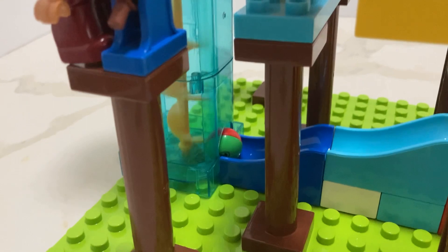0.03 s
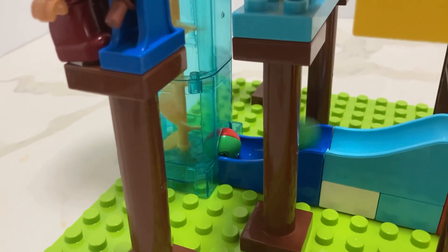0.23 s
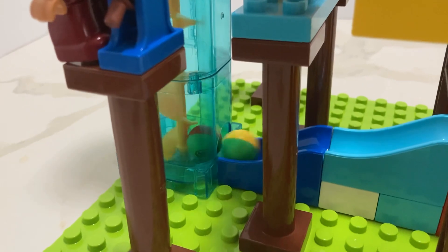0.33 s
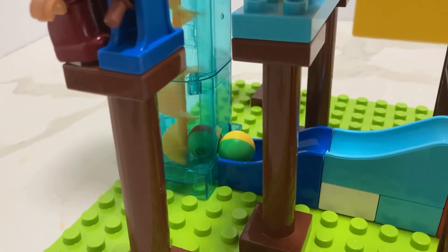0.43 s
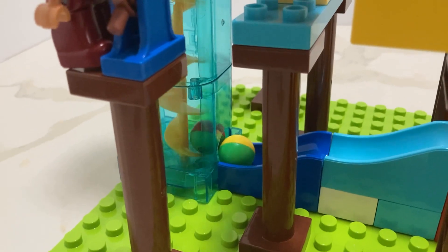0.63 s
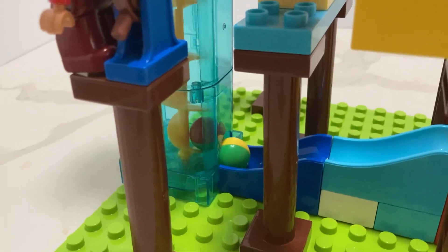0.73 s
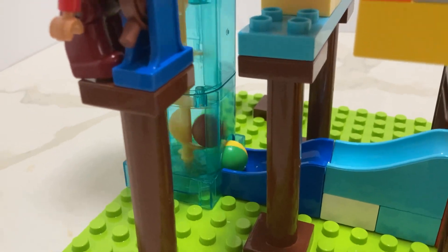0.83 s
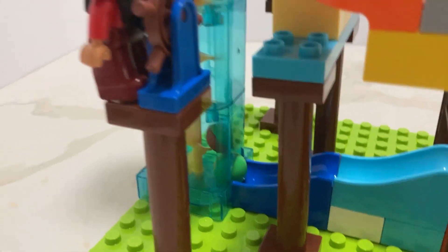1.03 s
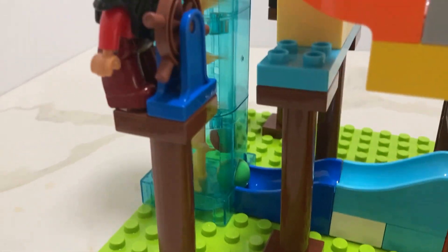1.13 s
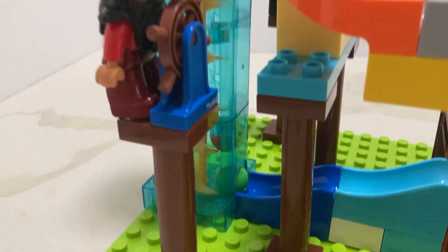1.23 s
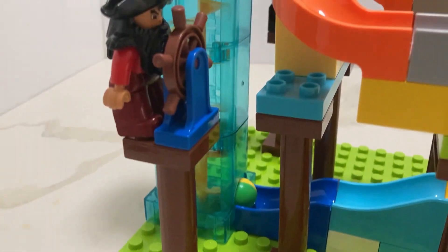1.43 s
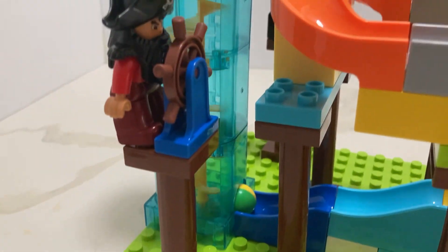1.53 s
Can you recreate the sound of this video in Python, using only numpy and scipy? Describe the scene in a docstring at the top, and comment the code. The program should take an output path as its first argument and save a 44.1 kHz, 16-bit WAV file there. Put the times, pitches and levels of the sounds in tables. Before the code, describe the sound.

Marbles roll and clack in a plastic chute from about 0.1 to 0.7 seconds, quick and hard, with soft low bumps of the base around 0.4. From 0.8 seconds a screw lift rubs them along its tube, with sharp knocks near 1.1 and 1.3, easing off by 1.5. A small motor hums faintly throughout, heard close in a small room.

```python
"""A plastic marble run, close by in a small room.
Marbles roll down a chute and clack against its walls and each other; a screw lift then rubs and
knocks them along its tube. Each contact excites dense, short-lived modes of the plastic and a set
of distinct ringing ones. The base bumps softly on the table; a small motor hums over the room air."""
import sys
import numpy as np
from scipy import signal
from scipy.fft import rfft, irfft
from scipy.io import wavfile
from scipy.ndimage import uniform_filter1d

SR = 44100
rng = np.random.default_rng(int(sys.argv[2]) if len(sys.argv) > 2 else 0)


def transcribe(signal):
    """Save signal, clipped to [-1, 1], as a 16-bit WAV file at the path in sys.argv[1]."""
    frames = np.atleast_2d(signal).T
    limited = np.clip(frames, -1, 1)
    pcm = np.round(limited * 32767).astype(np.int16)
    wavfile.write(sys.argv[1], SR, pcm)


N = 70560
TIME_S = np.arange(N) / SR
BAND_EDGES_HZ = 25 * 2 ** (np.arange(29) / 3) * 1.02


def from_db(db):
    """Decibels to gain."""
    return 10 ** (np.asarray(db) / 20)


def unit_rms(x):
    """Scale to unit power."""
    return x / np.sqrt(np.mean(x ** 2) + 1e-20)


def at_hz(table, hz, column=1):
    """Interpolate a table column over log frequency."""
    table = np.array(table)
    return np.interp(np.log(hz), np.log(table[:, 0]), table[:, column])


def bell(hz, centre_hz, octaves):
    """Gaussian hump over log frequency."""
    return np.exp(-(np.log2(hz / centre_hz) / octaves) ** 2)


def drift(corner_hz):
    """Slow random wander, unit RMS."""
    hop, settle = 40, 2000
    pole = np.exp(-2 * np.pi * corner_hz * hop / SR)
    noise = rng.standard_normal(N // hop + settle + 2)
    slow = signal.lfilter([1], [1, -2 * pole, pole * pole], noise)[settle:]
    return np.interp(np.arange(N) / hop, np.arange(len(slow)), unit_rms(slow))


def noise_bands(lowest_hz):
    """Yield (centre in Hz, stereo noise with a flattened envelope) per third octave."""
    for low, high in zip(BAND_EDGES_HZ, BAND_EDGES_HZ[1:]):
        hz = np.sqrt(low * high)
        if hz > lowest_hz:
            bandpass = signal.butter(3, [low, high], "band", fs=SR, output="sos")
            band = signal.sosfilt(bandpass, rng.standard_normal((2, N + 4000)))
            power = uniform_filter1d(band ** 2, int(2 * SR / (high - low)), axis=1)
            yield hz, (band / np.sqrt(np.abs(power) + 1e-14))[:, -N:]


def clicks(start_s, sizes):
    """One impulse per contact."""
    return np.bincount(np.clip(start_s * SR, 0, N - 1).astype(int), sizes, N) + 1e-18


def decay(x, t60_s):
    """Each impulse starts an exponential decay."""
    return signal.lfilter([1], [1, -from_db(-60 / (t60_s * SR))], x)


def soften(x, rise_s):
    """One-pole low-pass: spreads a contact in time."""
    pole = np.exp(-1 / (rise_s * SR))
    return signal.lfilter([1 - pole], [1, -pole], x)


def ring(x, hz, t60_s):
    """One mode: each impulse starts a damped sine."""
    radius, angle = from_db(-60 / (t60_s * SR)), 2 * np.pi * hz / SR
    return signal.lfilter([0, np.sin(angle)], [1, -2 * radius * np.cos(angle), radius * radius], x)


# Each row: frequency in Hz, band level in dB.
AIR_SPECTRUM = [(28,-69),(55,-59),(110,-62),(160,-67.5),(230,-48.5),(400,-65),(1500,-57),(5000,-71),(11000,-70.5),(15000,-69)]


def room_air():
    """Steady noise of the room."""
    return sum(band * from_db(at_hz(AIR_SPECTRUM, hz)) for hz, band in noise_bands(20))


# Each row: frequency in Hz, level in dB.
MOTOR_LINES = [(64,-61.5),(130,-55.5),(240,-52),(323,-60.5),(1152,-64.5),(1561,-54.5),(1895,-58.5)]


def motor(waver_hz=3.78, flutter_db=1.5):
    """Faint hum; each line wavers in pitch and level."""
    out = np.zeros((2, N))
    for hz, db in MOTOR_LINES:
        for channel in out:
            cycles = np.cumsum(hz + waver_hz * drift(8.76)) / SR + rng.random()
            channel += np.sqrt(2) * np.sin(2 * np.pi * cycles) * from_db(db - flutter_db * drift(2))
    return out


# How hard the marbles roll. Each row: time in seconds, level in dB.
ROLL_EFFORT = [(.08,-40),(.2,-35),(.29,-47),(.37,-29),(.44,-37),(.5,-28.5),(.6,-32.5),(.7,-34),(.79,-40),(.89,-40.5),(.95,-37),(1.07,-38),(1.16,-29),(1.22,-31),(1.26,-38),(1.34,-31),(1.44,-38),(1.54,-46)]
# Each row: frequency in Hz, band gain in dB.
ROLL_SPECTRUM = [(200,-23),(400,-45.5),(700,-20),(1100,-15.5),(1800,-15.5),(2900,-9),(4300,-24.5),(7000,-18),(11000,-17),(15000,-50)]
# Lift tube resonances, also rung by rubs and knocks. Each row: frequency in Hz, gain in dB, T60 in seconds.
TUBE_MODES = [(329,-12.5,0.096),(400,-15,0.04),(480.5,-17,0.052),(1096,-10,0.071),(1502,-10,0.087),(1676,-3,0.022),(1922,-9,0.086),(2480,-14,0.1),(2620,-19,.06),(2797,-8,0.1),(3450,-14,0.092),(4235,-12.5,0.087),(4965,-11.5,0.075),(6100,-11.5,0.046)]


def rolling(grain_db=1.5, patchy_db=2, touches_per_s=330, waver_db=3, ring_db=-4, corner_hz=3920):
    """Marbles roll on plastic: a grainy rush, brighter when harder, and tiny contacts ringing the tube."""
    effort_db = np.interp(TIME_S, *np.transpose(ROLL_EFFORT))
    flicker_db = grain_db * drift(58)
    out = np.zeros((2, N))
    for hz, band in noise_bands(180):
        tilt_db = 0.39 * np.log2(hz / 2000) * (effort_db - effort_db.mean())
        colour_db = at_hz(ROLL_SPECTRUM, hz) + tilt_db + patchy_db * drift(41)
        out += band * from_db(effort_db + flicker_db + colour_db)
    for hz, db, t60_s in TUBE_MODES:
        touching = rng.random((2, N)) < touches_per_s / SR
        touches = touching * rng.standard_normal((2, N)) + 1e-18
        ringing = unit_rms(ring(touches * from_db(waver_db * drift(10)), hz, t60_s))
        rolloff = np.hypot(1, hz / corner_hz)  # soft contacts barely wake the high modes
        out += ringing * from_db(effort_db + db + ring_db) / rolloff
    return out


def excitation_db(hits, hz):
    """Strength of each hit at one frequency; the spot struck sets the colour."""
    _, level_db, hollow_db, ring_db, crack_db, knock_db, _ = np.transpose(hits)
    return (level_db
            + hollow_db * bell(hz, centre_hz=910, octaves=0.53)
            + ring_db * bell(hz, centre_hz=3780, octaves=0.26)
            + crack_db / (1 + (4810 / hz) ** 10)  # treble shelf
            + knock_db * bell(hz, centre_hz=395, octaves=0.46))  # housing


# Decay of the plastic's dense modes. Each row: frequency in Hz, T60 in seconds.
PLASTIC_DECAY = [(200,0.071),(1000,0.045),(3000,0.039),(8000,0.026),(15000,0.017)]


def struck_plastic(hits, body, modes, modes_db, rise_s=0.0009, favour_db=15.5, scatter_db=2.5):
    """Hits excite dense modes (noise bands) and distinct ones (sines); each spot favours one pitch."""
    start_s, *_, favoured_hz = np.transpose(hits)
    out = np.zeros((2, N))
    for hz, band in noise_bands(180):
        treble_spread_db = 6 / np.hypot(1, 6200 / hz)  # high modes vary from hit to hit
        chance_db = treble_spread_db * np.clip(rng.standard_normal(len(start_s)), -2, 1)
        blows = clicks(start_s, from_db(excitation_db(hits, hz) + at_hz(body, hz) + chance_db))
        band_rise_s = rise_s * np.sqrt(2500 / hz)  # high bending waves arrive first
        out += band * soften(decay(blows, at_hz(PLASTIC_DECAY, hz)), band_rise_s)
    for hz, db, t60_s in modes:
        level_draw, phase_draw, stereo_draw = rng.standard_normal((len(start_s), 3)).T
        spot_db = excitation_db(hits, hz) + favour_db * bell(hz, favoured_hz, octaves=0.082)
        sizes = from_db(spot_db + db + modes_db + scatter_db * level_draw)
        for channel, side in zip(out, (1, -1)):
            phase = 2 * np.pi * phase_draw + side * np.tanh(stereo_draw)
            blows = clicks(start_s, sizes * np.cos(phase)) + 1j * clicks(start_s, sizes * np.sin(phase))
            envelope = soften(decay(blows, t60_s), rise_s)
            channel += np.real(envelope * np.exp(2j * np.pi * hz * TIME_S))
    return out


# Each row: start in seconds, level in dB, hollowness, ring, crack and low knock in dB,
# favoured pitch in Hz.
CHUTE_CLACKS = [(.1217,-22,-13,0,-3.5,-2,3530),(.1405,-33.5,4,-17,-2,-11,2090),(.162,-35,10.5,-4,-12,-6,2280),(.181,-27,-3.5,-25,-4,8,3110),(.190,-28.5,-33,-1.5,-5,6,3110),
                (.1985,-49,4,-4,0,8,3110),(.2613,-29,8,-20,-7,11,935),(.305,-44,15,4,5.5,18,2280),(.330,-27,-2,-24,-3.5,7,1500),(.3405,-21,7.5,6,4,3,935),
                (.3555,-37.5,3,7.5,0,-5,3530),(.3625,-37.5,8,-13,15.5,18.5,1500),(.3775,-41,11,-9,10,-3,935),(.3705,-29.5,10,-15,-7,16,1130),(.3855,-29,19,11.5,6.5,-6,3530),(.4065,-29.5,14.5,5,3,14,3530),(.4105,-33.5,9,12.5,-3,-25,3530),
                (.4605,-21,-14,-8,1.5,9,1870),(.469,-23,9.5,15.5,9.5,-6,3120),(.473,-23.5,-4.5,-9,-2,10,1130),(.513,-32,0,9,8,-15,6290),(.530,-32,-5,11.5,-2,-8,3790),
                (.545,-30.5,-9,8.5,6.5,16,1870),(.575,-28,-10,-2,-3,4,1870),(.6015,-15,-10.5,0.5,-8.5,-24,1150),(.604,-26,-14,-8,7.5,-18,5620),(.613,-28,-7,-12,-1,4,1450),(.643,-22.5,-1.5,2.5,2,-4,2280),
                (.658,-28,-10,3,7.5,4.5,2580),(.6715,-21.5,-7,0.5,-0.5,-15,2280),(.7095,-27,-7,-7.5,-2.5,-8,3330)]
# Dense modes. Each row: frequency in Hz, band gain in dB.
CHUTE_SPECTRUM = [(200,-22.5),(400,-21),(700,-16),(1100,-5),(2000,-4),(3400,-1.5),(4600,-5),(7000,-3.5),(11000,-5),(15000,2)]
# Each row: frequency in Hz, gain in dB, T60 in seconds.
CHUTE_RESONANCES = [(549.6,-15.5,0.08),(935,-11,0.017),(1150,-6,0.033),(1450,4.5,0.013),(1850,-7,0.057),(2085,-2.5,0.036),(2267,-2.5,0.024),(2560,-3,0.043),(3080,-8,0.059),(3384,-5.5,0.042),(3510,-5.5,0.029),(3790,-13.5,0.066),(4090,-26,.04),(5660,-8.5,0.055),(6160,-8,0.033),(6830,-14,0.069),(8570,-12.5,0.035),(9500,-7,0.032),(9940,-14,0.059),(11200,-8.5,0.033)]


def chute_clacks():
    """Marbles strike the chute walls and each other."""
    return struck_plastic(CHUTE_CLACKS, CHUTE_SPECTRUM, CHUTE_RESONANCES, modes_db=-1.5)


# Each row: start in seconds, level in dB.
BASE_BUMPS = [(0.354,-33.5),(0.377,-31.5),(0.445,-27),(0.465,-42),(0.597,-49),(1.256,-48),(1.479,-42.5)]


def base_bumps(highpass_hz=45.3):
    """The base thuds on the table: soft contacts ring one low mode."""
    start_s, db = np.transpose(BASE_BUMPS)
    pushes = soften(clicks(start_s, from_db(db)), rise_s=0.001)
    thuds = 2 * ring(pushes, hz=67, t60_s=0.096)
    return signal.sosfilt(signal.butter(2, highpass_hz, "high", fs=SR, output="sos"), thuds)


# Each row: as in CHUTE_CLACKS.
SCREW_RUBS = [(.8295,-27.5,3,-4,3.5,0,1890),(.837,-33.5,4.5,1,-0.5,0,1890),(.912,-35.5,1,-10,0,0.013,1170),(.933,-35,-14,-2,4,0,1170),(.995,-37.5,11.5,-35,0,0,2790),
              (1.017,-31,-18,1,1,0,1170),(1.096,-32,-2,0,2.5,0,1170),(1.2125,-30,4,-2,8,0,1890),(1.2195,-35,-7,14,-12,0,2790),(1.278,-24,3,-3,-3,0,1170),(1.387,-41,14,3,-22,0,1170),(1.415,-37.5,22,0,5.5,0,1220)]
# Dense modes. Each row: frequency in Hz, band gain in dB.
RUB_SPECTRUM = [(200,-18),(700,-20),(1100,-13.5),(2000,4.5),(3400,-8),(7000,-8),(15000,-10.5)]


def screw_rubs():
    """The screw rubs a marble along the tube: contacts with a slow rise."""
    return struck_plastic(SCREW_RUBS, RUB_SPECTRUM, TUBE_MODES, modes_db=-1, rise_s=0.0066)


# Each row: as in CHUTE_CLACKS.
TUBE_KNOCKS = [(.9722,-38.5,-7,-20,2.5,0,2420),(1.126,-18,-7.8,-14,6,-13,1611),(1.129,-18,-8.7,-16,-9,6,1560),(1.1885,-27.5,1.4,-6,-3.5,1,1170),
               (1.2885,-21,4.3,2,0.5,-7,2435),(1.3025,-24,-9,5.5,13,-17,2740),(1.307,-21.5,4.8,-9,-4,-3,2690),(1.571,-43,9,-38,1,12.5,1170)]
# Dense modes. Each row: frequency in Hz, band gain in dB.
TUBE_SPECTRUM = [(200,-32),(400,-16),(700,-27),(1100,-7.5),(2000,-3.5),(3400,0),(4600,-2),(7000,-2.5),(11000,-10.5),(15000,1.5)]


def tube_knocks():
    """Marbles knock about in the lift tube."""
    return struck_plastic(TUBE_KNOCKS, TUBE_SPECTRUM, TUBE_MODES, modes_db=0.5)


def room_reverb(x, t60_s=0.55, gain_db=-16.5, corner_hz=9700, delay_s=0.0053):
    """Diffuse, slightly dull tail of a small room."""
    t = TIME_S[:SR]
    onset = np.clip(t / delay_s - 1, 0, 1)
    tail = rng.standard_normal((2, SR)) * from_db(-60 * t / t60_s) * onset
    tail = soften(tail, 1 / (2 * np.pi * corner_hz))
    return from_db(gain_db) * signal.fftconvolve(x, unit_rms(tail) / np.sqrt(SR), axes=1)[:, :N]


def scene():
    """Marbles and their reverb, slightly left, over bumps, hum and air."""
    marbles = chute_clacks() + tube_knocks() + screw_rubs() + rolling()
    balance = from_db([[0.6], [-0.6]])
    return (marbles + room_reverb(marbles)) * balance + base_bumps() + motor() + room_air()


# Each row: frequency in Hz, mid gain in dB, side gain in dB.
MIC_RESPONSE = [(60,-4.5,-4),(268,-4.5,-16.5),(540,2,-1.5),(785,0.5,1),(1130,-2.5,-2),(2500,-4,-3.5),(4200,-1.5,-3),(5860,-4.5,-3.5),(6740,-1.5,-9.5),(8820,-3,-11),(8940,-12.5,1),(9900,1,-9),(11400,1.5,-11),(12460,-1.5,-12.5),(14360,-17,-10),(14520,2,-11),(16000,-23,-9)]


def record(dry, start_s=0.078, ceiling=1.1, cutoff_hz=16400):
    """Microphones colour mid and side; the sound cuts in, peaks are rounded, the top is cut."""
    hz = np.maximum(np.arange(N + 1) * SR / (2 * N), 1)

    def colour(x, column):
        gain = from_db(at_hz(MIC_RESPONSE, hz, column))
        return irfft(rfft(x, 2 * N) * gain)[:N] / np.sqrt(2)

    mid = colour(dry[0] + dry[1], column=1)
    side = colour(dry[0] - dry[1], column=2)
    stereo = np.array([mid + side, mid - side]) * (TIME_S > start_s)
    rounded = ceiling * np.tanh(stereo / ceiling)
    return signal.sosfilt(signal.ellip(10, 0.2, 80, cutoff_hz, fs=SR, output="sos"), rounded)


dry = scene()
out = record(dry)
transcribe(out)
```